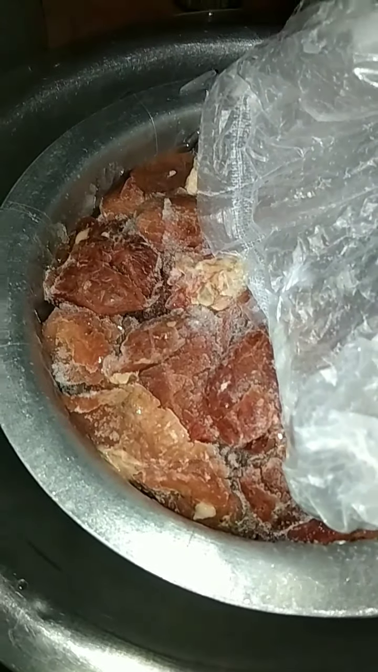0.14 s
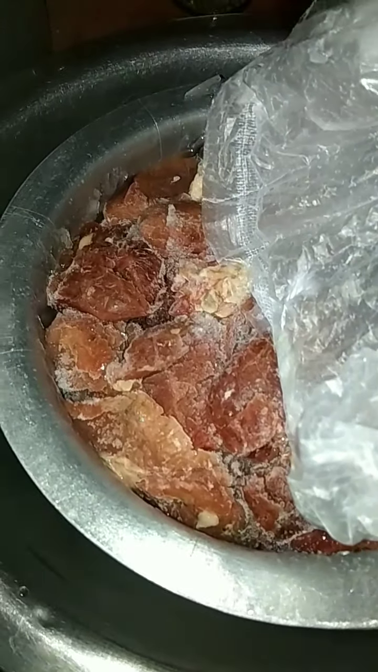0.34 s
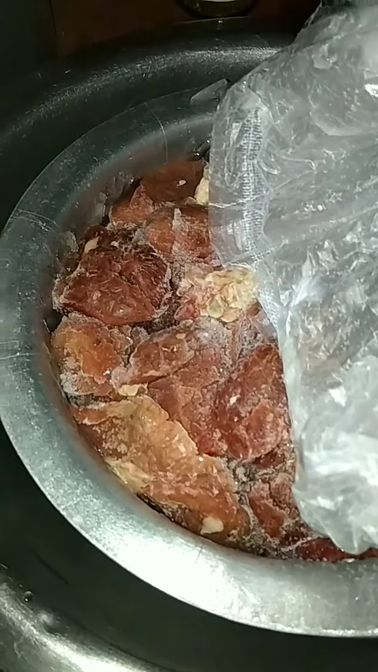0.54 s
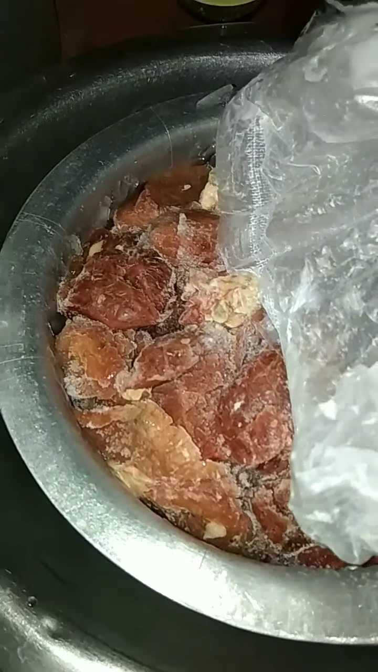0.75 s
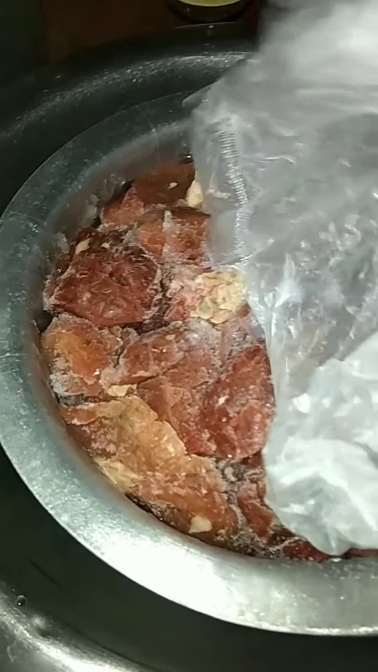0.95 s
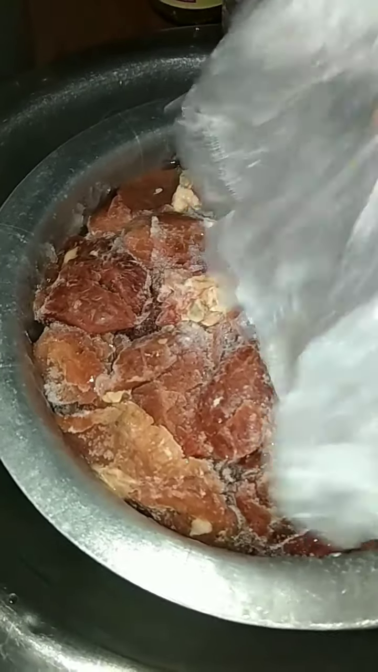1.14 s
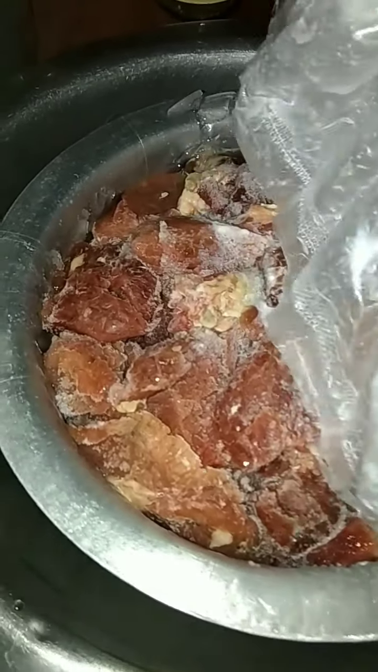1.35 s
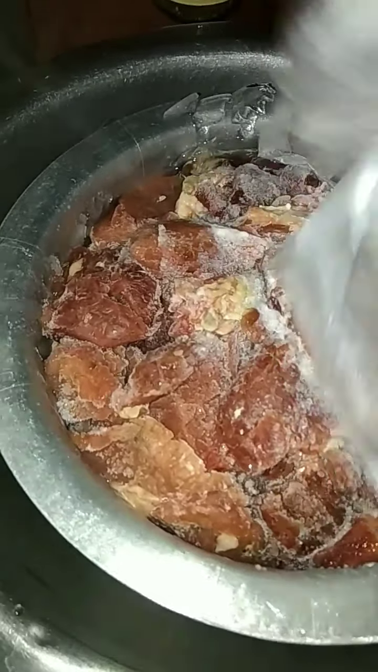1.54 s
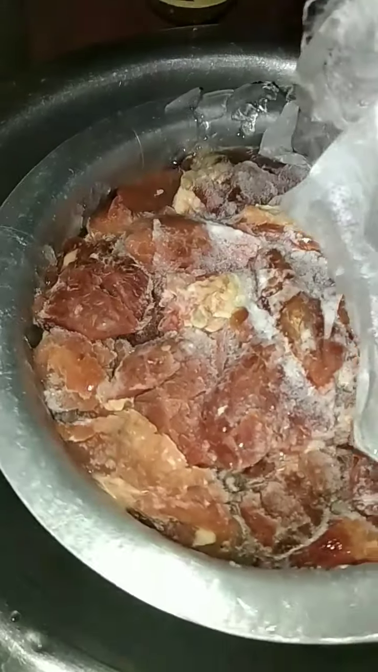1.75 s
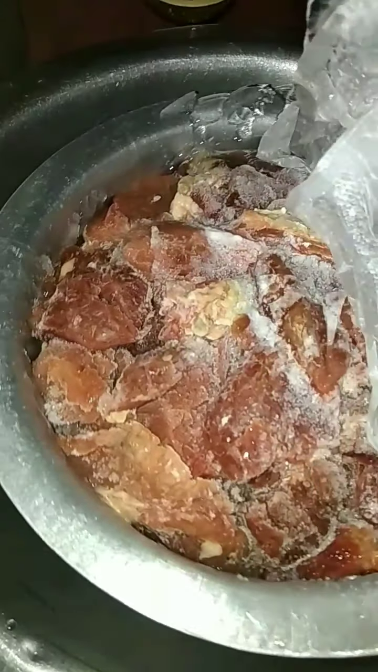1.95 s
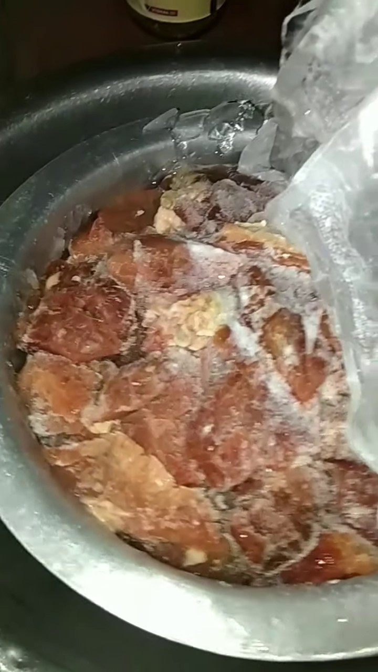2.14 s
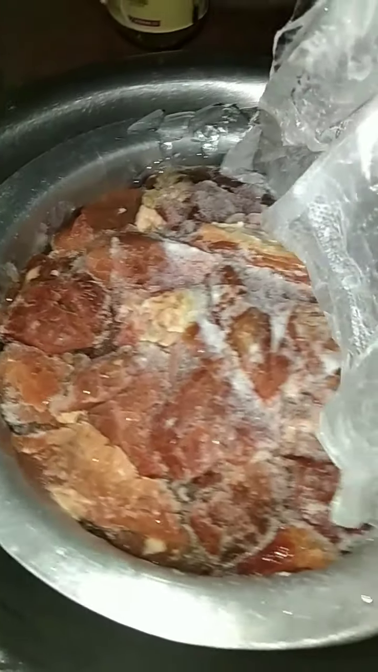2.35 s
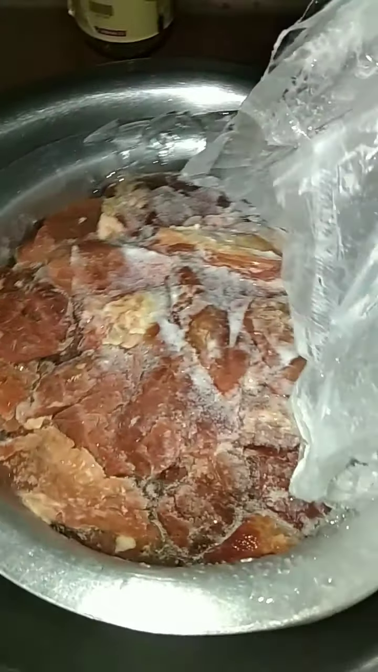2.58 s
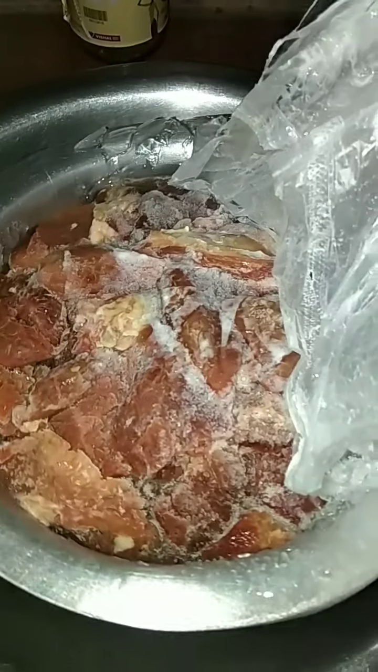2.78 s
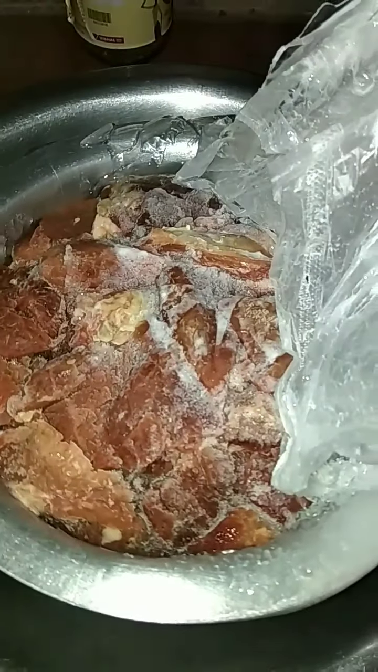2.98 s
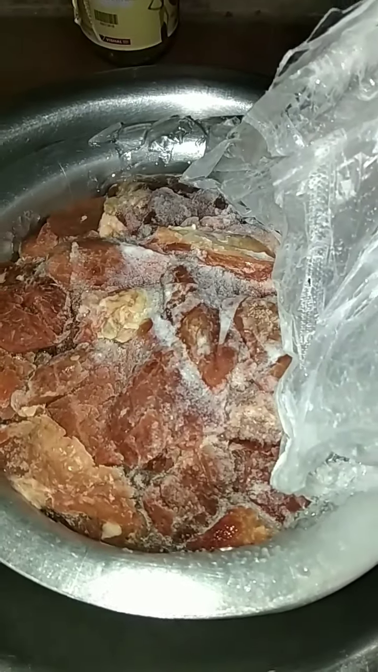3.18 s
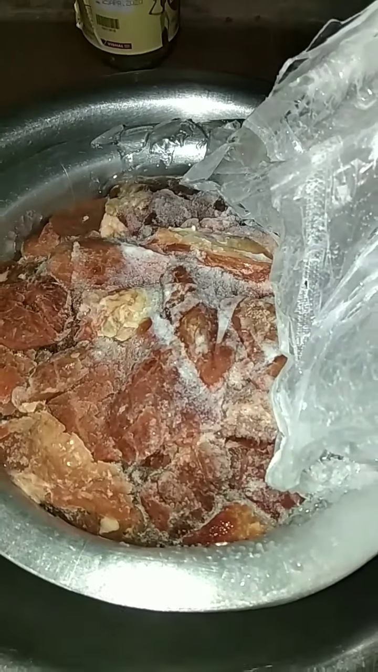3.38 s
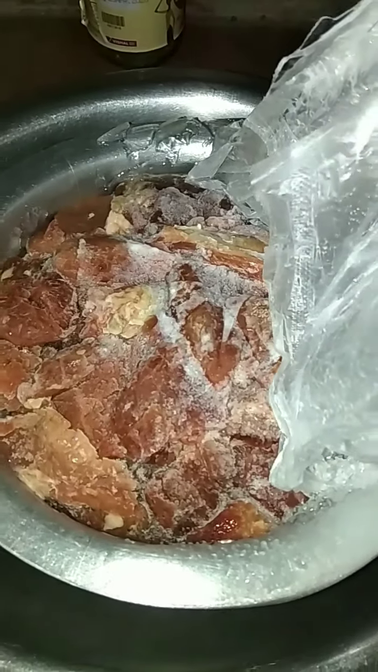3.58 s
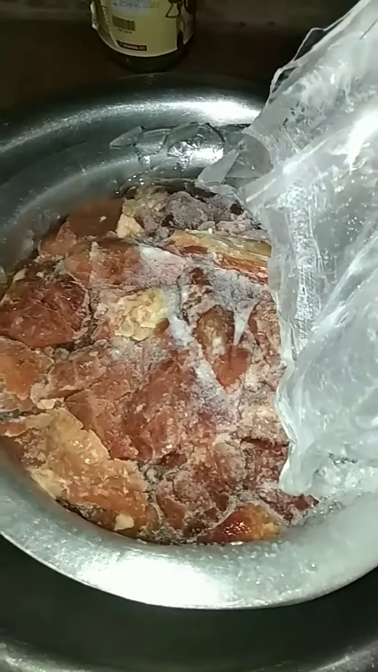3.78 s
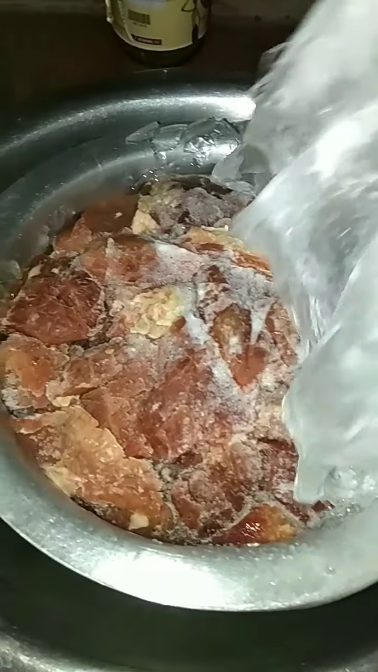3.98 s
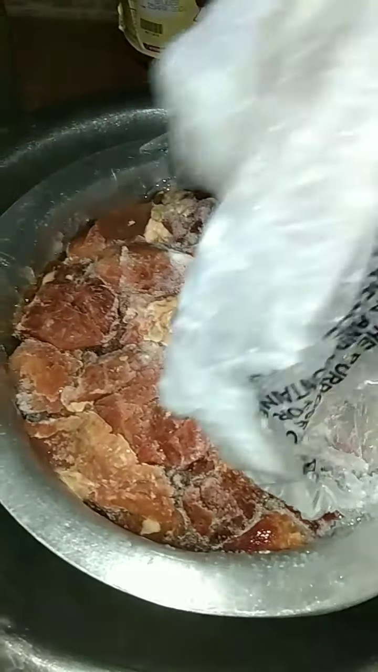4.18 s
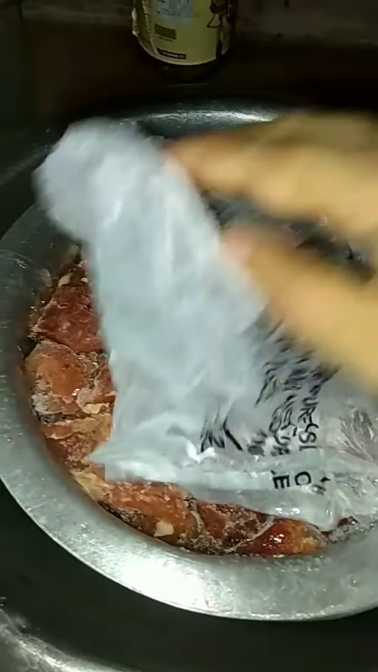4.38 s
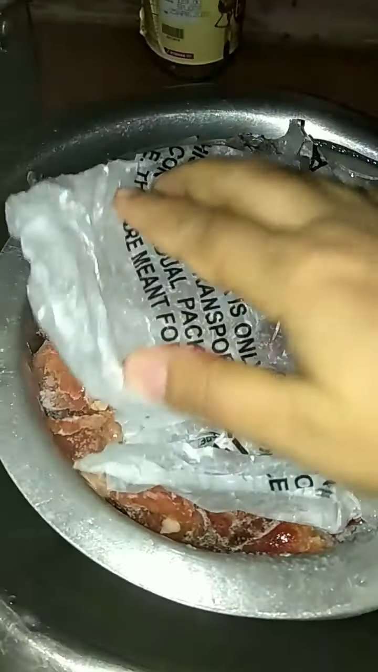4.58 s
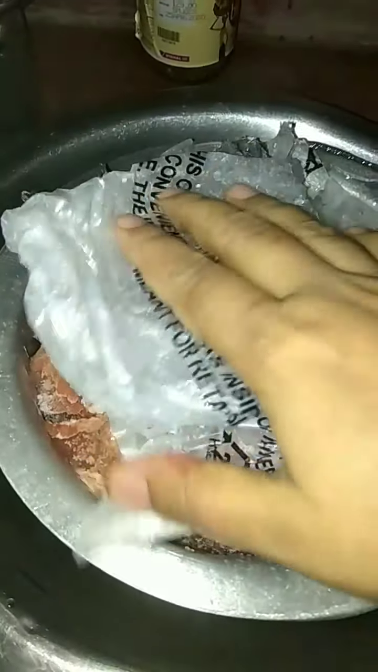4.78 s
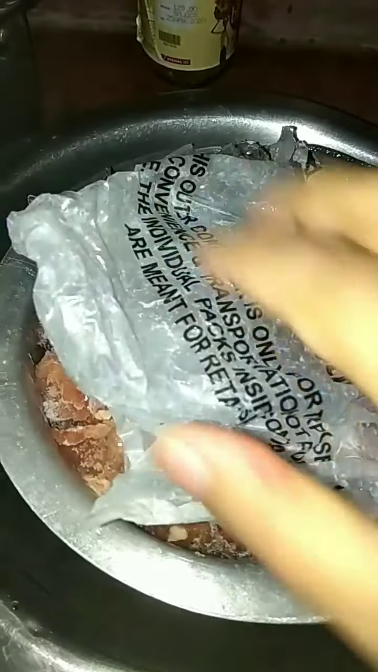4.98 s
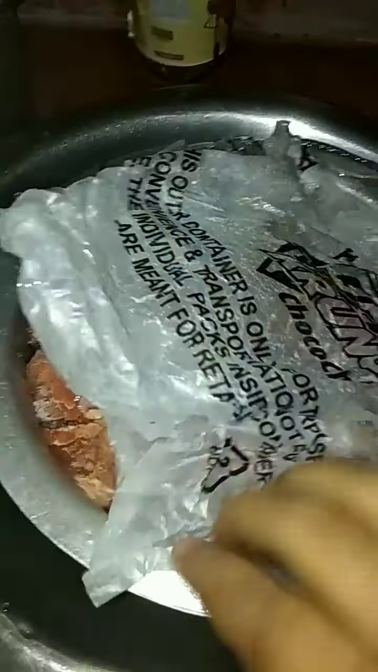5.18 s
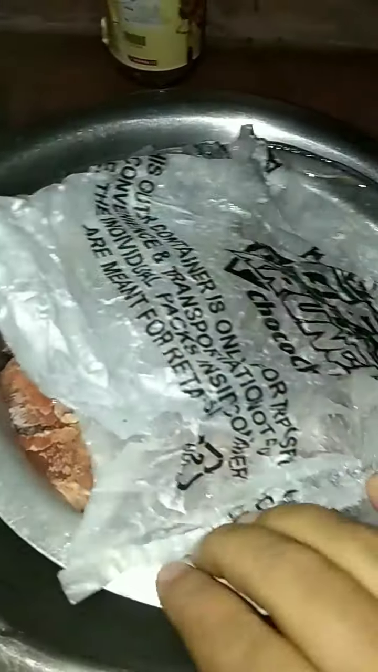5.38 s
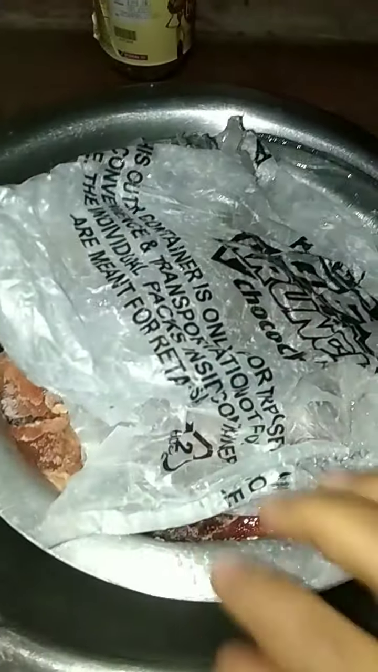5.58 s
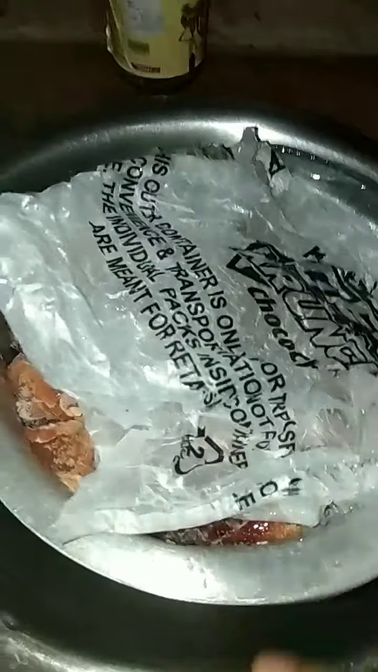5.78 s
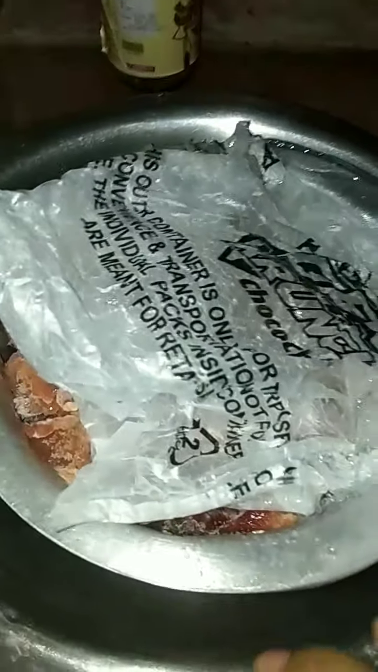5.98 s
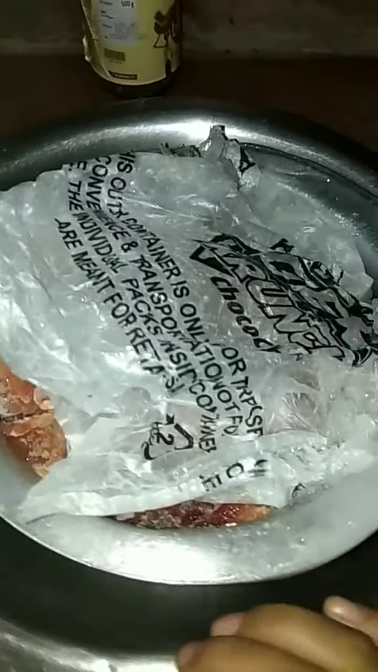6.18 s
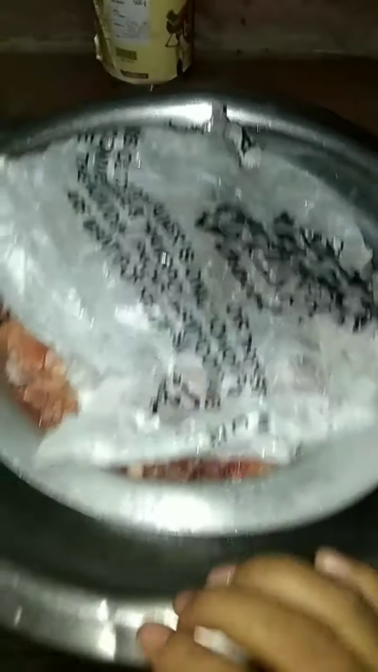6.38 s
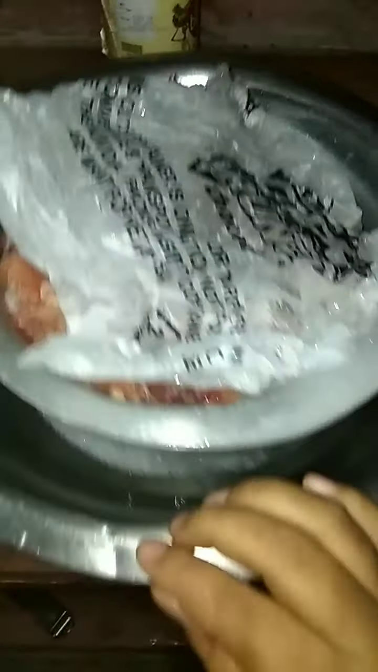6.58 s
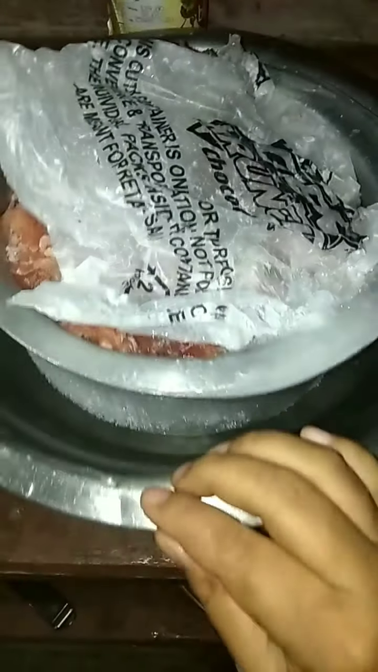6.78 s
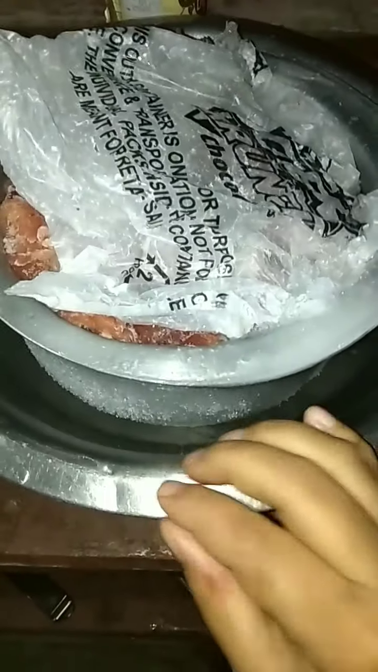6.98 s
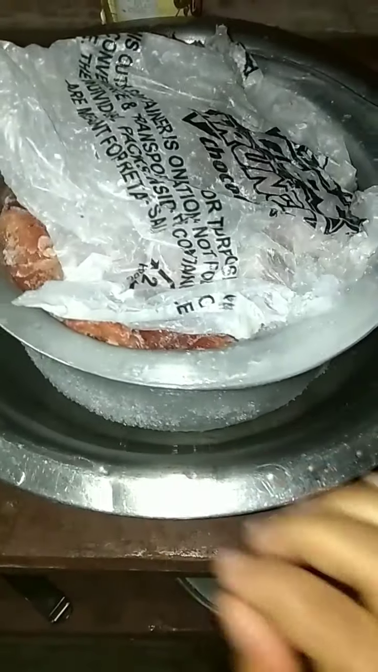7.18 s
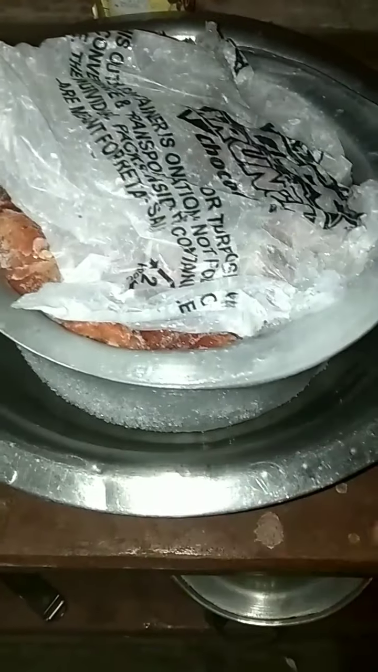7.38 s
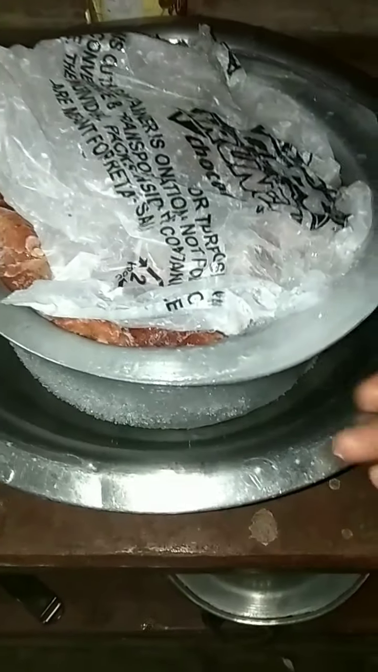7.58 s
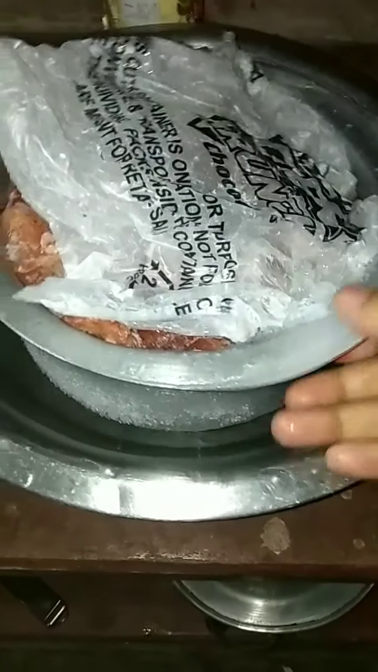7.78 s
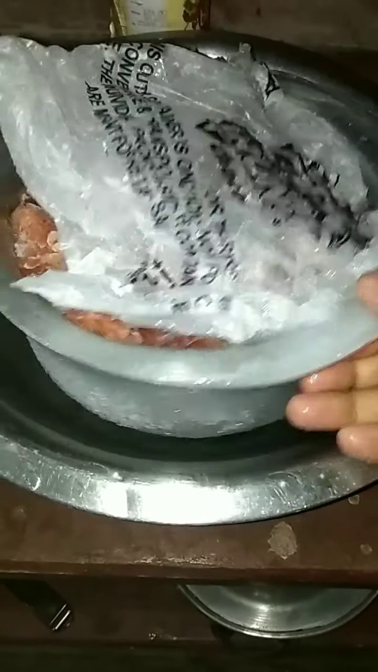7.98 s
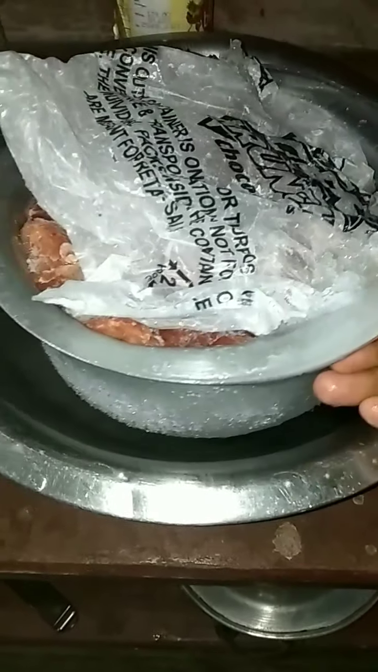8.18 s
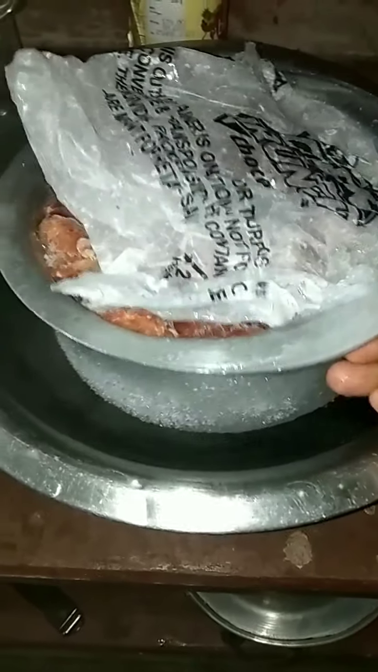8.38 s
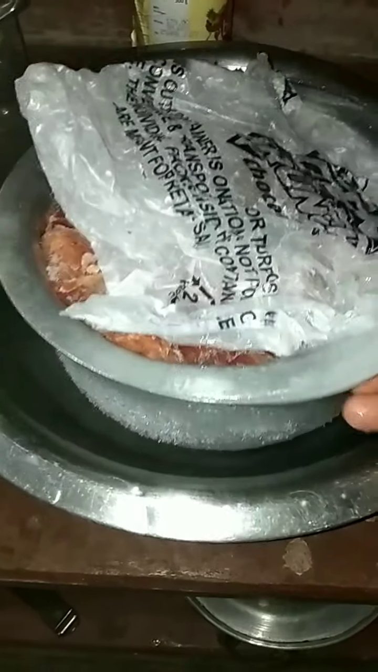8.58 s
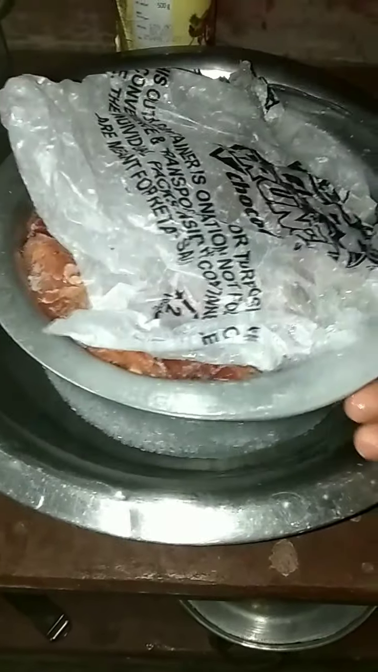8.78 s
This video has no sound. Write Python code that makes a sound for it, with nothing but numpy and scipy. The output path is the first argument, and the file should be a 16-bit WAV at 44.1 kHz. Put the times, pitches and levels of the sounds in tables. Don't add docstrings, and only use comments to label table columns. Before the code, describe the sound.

Crisp plastic crackling starts quietly, swells to its loudest within two seconds and thins into small ticks. A softer, broader rustle follows as the bag is laid back and pressed, with a faint distant crow behind. After a short quiet gap, a steel basin scrapes and clunks on the counter, rings briefly, then slips a few more times. Close miking, short room echo, low hum and hiss.

```python
import sys
import numpy as np
from scipy import signal
from scipy.io import wavfile

SR = 44100
rng = np.random.default_rng(int(sys.argv[2]) if len(sys.argv) > 2 else 0)


def magnitude_from_level(level_db):
    exponent = np.asarray(level_db, float) / 20
    return 10 ** exponent


def waveform_to_disk(signal):
    frames = np.transpose(np.atleast_2d(signal))
    scaled = np.clip(frames, -1, 1) * 32767
    samples = np.round(scaled).astype(np.int16)
    wavfile.write(sys.argv[1], SR, samples)


N = 389844

# (frequency [Hz], density [dB per Hz])
HUM_SPECTRUM = [(22, 14), (36, -6), (60, -17), (130, 0.5), (190, -13), (330, -4.5), (600, -9),
                (1000, -11.5), (2000, -18.5), (5000, -22), (8300, -27), (10300, -24), (12000, -28),
                (14000, -29), (15800, -30)]
# (frequency [Hz], left-right likeness [-1..1])
HUM_LIKENESS = [(60, 0.73), (180, 1), (550, 0.58), (1650, -0.095), (4970, -0.083), (15000, 0.064)]
# (time [s], peak level [dB], half length [s])
RUMBLE_SWELLS = [
    (0.5, -52, 0.44),
    (1.19, -45, 0.12),
    (1.62, -30, 0.13),
    (2.9, -51.5, 0.47),
    (5.403, -55, 0.31),
    (6.92, -48.5, 0.21),
    (7.8, -53, 0.29),
    (8.074, -47, 0.066),
    (8.787, -33, 0.04),
]
# (frequency [Hz], difference [dB])
PAIR_TILT = [(60, 7), (150, -3), (380, 0), (950, -2), (2380, -4), (5980, -2), (15000, -3)]
# (frequency [Hz], density [dB per Hz])
FILM_SPECTRUM = [(65, -30), (120, -7.5), (190, -6), (310, -3.5), (400, -1.5), (600, -6.5), (1500, -3.5),
                 (2600, -6), (5000, -4), (8200, -8.5), (10300, -1.5), (12500, -4), (15000, -5), (16200, -7)]
# (time [s], crease level [dB])
PEELING_MOVES = [
    [(0.45, -77), (0.634, -61.5), (0.652, -34.5), (0.786, -55.5), (0.818, -68)],
    [(0.818, -56), (0.85, -36), (1.03, -29.5), (1.068, -32.5)],
    [(1.068, -31), (1.085, -26), (1.125, -21), (1.18, -19.5), (1.226, -25.5), (1.241, -31), (1.252, -27),
     (1.285, -42), (1.372, -39.5)],
    [(1.372, -55), (1.39, -34.5), (1.45, -33.5), (1.5, -30)],
    [(1.5, -25), (1.52, -18), (1.534, -17.5), (1.549, -17.5), (1.575, -22.5), (1.6, -27.5), (1.704, -38),
     (1.984, -53), (2.03, -67)],
    [(2.13, -75), (2.176, -61), (2.282, -52), (2.302, -44.5), (2.53, -38), (2.692, -50.5), (2.712, -53),
     (2.728, -58), (2.774, -78)],
    [(2.8, -72), (2.87, -56.5), (2.98, -73), (3.006, -55), (3.052, -68.5), (3.3, -57.5), (3.406, -84),
     (3.494, -53), (3.736, -76)],
]
# (time [s], crease level [dB])
LAYING_MOVES = [
    [(3.74, -68), (3.766, -59), (3.914, -63), (3.976, -42.5), (4.268, -34.5), (4.35, -31), (4.43, -30),
     (4.47, -33), (4.644, -38), (4.702, -45)],
    [(4.702, -54), (4.72, -45), (4.732, -38), (4.746, -32.5), (4.776, -46), (4.822, -40), (4.842, -47.5),
     (5.0, -75)],
    [(5.1, -86), (5.158, -35.5), (5.216, -40), (5.298, -61), (5.326, -48.5), (5.38, -76)],
    [(5.39, -63), (5.5, -53.5), (5.53, -54), (5.58, -62)],
]
# (mid share [dB], low share [dB])
MOVE_BODY = [(-8, -10.5), (-13, -15), (-15.5, -16.5), (-15, -15), (-13, -15), (-12.5, -15.5), (-11, -3.5),
             (-14, -17), (-12.5, -16.5), (-12, -18.5), (-10, -5)]
# (time [s], peak level [dB], mid share [dB])
FILM_SNAPS = [(0.4647, -35.5, -14.5), (0.537, -49, -14), (0.5696, -45, -2), (0.5936, -33.5, -20),
              (0.6476, -23, -25), (0.7744, -29.5, -10), (0.8367, -34, -20), (0.851, -35, -23),
              (1.0753, -13, -26), (1.1, -16, -25), (1.252, -17, -27), (1.3226, -18, -19.5),
              (1.3808, -18, -35), (1.4442, -16, -17), (1.507, -15, -14), (1.518, -5, -21),
              (1.734, -25.5, -13.5), (1.8559, -25.5, -16), (1.9637, -28, -17), (2.0381, -25.5, -22.5),
              (2.042, -32, -23), (2.167, -36, -16), (2.201, -38.5, -17), (2.2463, -38, -13),
              (2.2997, -28.5, -16), (2.307, -30, -19), (2.3415, -24.5, -24), (2.346, -22, -22),
              (2.354, -23, -25), (2.361, -30, -23), (2.445, -29, -22), (2.46, -27, -22),
              (2.513, -24, -18), (2.571, -31, -25), (2.589, -28, -25), (2.62, -30, -20),
              (2.692, -33, -12), (2.698, -32, -12), (2.4988, -20, -12), (2.6444, -25, -25),
              (2.6777, -25.5, -17), (2.725, -23, -17),
              (2.79, -31.5, -31), (2.8544, -43, -25), (2.8732, -30, -34), (3.017, -32, -14),
              (3.118, -37, -9), (3.173, -34.5, -11), (3.192, -38, -20), (3.225, -36, -11),
              (3.2395, -37, -11), (3.3045, -33, -8), (3.4674, -39, -9), (3.494, -36, -17),
              (3.5302, -34.5, -13.5), (3.5987, -38, -16), (3.6124, -39, -21), (3.6805, -34.5, -15),
              (3.759, -31.5, -19), (3.771, -42, -10), (3.813, -38.5, -11), (3.8324, -35, -16),
              (3.943, -35, -10), (4.039, -37, -14), (4.2535, -20, -13.5), (4.421, -20, -20),
              (4.443, -25, -20), (4.58, -30, -25), (4.595, -35, -25), (4.715, -26, -24),
              (4.7436, -22.5, -21), (4.8075, -28, -29), (5.1307, -42, -6), (5.1473, -22, -20),
              (5.3173, -34, -15), (5.4027, -44.5, -5), (5.4263, -42, -11), (5.496, -35.5, -15),
              (5.522, -35, -11), (5.8481, -40, -29)]
# (frequency [Hz], level [dB], t60 [s])
POT_RIM_MODES = [(1320, -17, 0.32), (2090, -5, 0.34), (3150, -7, 0.14), (3795, -8, .25), (4495, -17, .2)]
# (time [s], length [s], level [dB], pitch [Hz])
CROW_CALLS = [
    (4.717, .22, -45, 535),
    (5.41, .25, -48, 525),
]
# (frequency [Hz], width [Hz], level [dB])
CROW_THROAT = [(1030, 270, -11.5), (1600, 200, -2), (1950, 470, 1.7)]
# (time [s], grit level [dB])
BASIN_PUSHES = [
    [(6.2, -76), (6.225, -46), (6.338, -37), (6.378, -42), (6.39, -33), (6.418, -44)],
    [(6.418, -41), (6.64, -44), (6.722, -50.5)],
    [(6.722, -58), (6.742, -29.5), (6.772, -49.5), (6.784, -31), (6.83, -52.5), (6.905, -51.5), (6.93, -68)],
    [(7.48, -86), (7.5, -52), (7.55, -80)],
    [(7.98, -95), (8.0, -46), (8.036, -50), (8.124, -60.5), (8.135, -77)],
    [(8.3, -63), (8.34, -32), (8.424, -63)],
    [(8.424, -60), (8.446, -46), (8.508, -79), (8.53, -49), (8.56, -93)],
    [(8.72, -86), (8.744, -45), (8.762, -45), (8.8, -46.5), (8.84, -61)],
]
# (mid share [dB], low share [dB], steel drive over grit [dB])
PUSH_BODY = [(-6, -1.5, 4), (-3.5, -1, 2.5), (-5, 0.5, 13), (-1, -17, 11), (-1.5, 4.5, -11),
             (-6, -6.5, -23), (3, 6.5, 0), (-9, 5.5, -6)]
# (frequency [Hz], density [dB per Hz])
GRIT_SPECTRUM = [(140, -34), (230, -1), (317, -11.5), (691, -7.5), (918, -0.5), (1200, -11), (1500, -6.5),
                 (2390, -7.5), (4010, -11), (4870, -8), (11600, -8.5), (14000, -6), (16000, -14)]
# (time [s], peak level [dB], mid share [dB])
GRIT_TICKS = [(6.227, -24.5, -18.5), (6.3874, -19.5, -22), (6.5914, -27.5, -29), (6.7395, -29, -19),
              (7.061, -37, -30), (7.503, -47, -10), (7.9997, -26.5, -17), (8.027, -34, -6),
              (8.3354, -24, -15), (8.4382, -33.5, -19), (8.758, -23.5, -22), (8.7839, -31, -12)]
# (time [s], peak level [dB], modes favoured by the contact [Hz])
BASIN_KNOCKS = [(6.227, -32, 1020), (6.261, -36.5, 930), (6.29, -38, 930), (6.33, -42, 930),
                (6.389, -55, 1280), (6.638, -38, 950), (6.652, -38, 950), (6.678, -38.5, 950),
                (6.69, -40, 950), (6.738, -28, 1080), (6.74, -38, 1550), (6.756, -31, 335),
                (6.783, -23.5, 980), (6.786, -36, 1300), (6.807, -31, 1320), (6.862, -32.5, 226),
                (6.884, -42, 280), (6.951, -33, 224), (7.51, -51.5, 1300), (8.026, -30.5, 570),
                (8.028, -36.5, 900), (8.043, -35.5, 250), (8.051, -40.5, 91), (8.06, -43, 1320),
                (8.443, -38.5, 1370), (8.466, -47.5, 300), (8.555, -45.5, 294), (8.576, -43, 289),
                (8.739, -31, 483), (8.74, -40, 1500), (8.758, -30.5, 1030), (8.783, -35.5, 277),
                (8.806, -45, 300)]
# (frequency [Hz], level [dB], t60 [s])
BASIN_MODES = [(86, 5.5, 0.098), (190.7, -1, 0.23), (250, 5, 0.062), (291.6, -2.5, 0.18), (350, -26, 0.016),
               (480, 2.5, 0.048), (517.6, -4, 0.12), (588, -10, 0.073), (722, -13.5, 0.16),
               (824, -13, 0.12), (945, 1, 0.1), (1030, -2, 0.046), (1140, -1.5, 0.033), (1240, -12, 0.033),
               (1318, -6, 0.1), (1400, 5.5, 0.017), (1750, -1, 0.033), (2280, -18, 0.054)]
# (frequency [Hz], level [dB], t60 [s])
LIFTED_MODES = [(824, -7, .35), (913, -4, .3), (1309, -2, 0.43), (1470, -14, .3), (1712, -13, 0.33)]

CRACK_EDGES_HZ = 113 * 2 ** np.arange(0, 7.4, 1 / 3)


def rms_one(x):
    return x / np.sqrt(np.mean(x ** 2) + 1e-20)


def at_hz(points, hz):
    table_hz, value = np.transpose(points)
    return np.interp(np.log(hz), np.log(table_hz), value)


def band(x, low_hz, high_hz):
    sos = signal.butter(2, [low_hz, high_hz], "band", fs=SR, output="sos")
    return signal.sosfilt(sos, np.asarray(x) + 1e-18)


def drift(rate_hz):
    r = np.exp(-80 * np.pi * rate_hz / SR)
    noise = rng.standard_normal(N // 40 + 2002)
    slow = signal.lfilter([1], [1, -2 * r, r * r], noise)[2000:]
    return np.interp(np.arange(N) / 40, np.arange(len(slow)), rms_one(slow))


def ring(clicks, hz, t60):
    r, w = magnitude_from_level(-60 / (t60 * SR)), 2 * np.pi * hz / SR
    return signal.lfilter([0, np.sin(w)], [1, -2 * r * np.cos(w), r * r], clicks + 1e-18)


def room_hum(white):
    out, edges = 0, 22 * 2 ** np.arange(0, 9.6, 1 / 3)
    for k, (low, high) in enumerate(zip(edges, edges[1:])):
        hz = np.sqrt(low * high)
        mid, side = band(white[k % 2], low, high)
        alike = np.clip(at_hz(HUM_LIKENESS, hz), -1, 1)
        gain = magnitude_from_level(at_hz(HUM_SPECTRUM, hz) + 1.0 * drift(4.3))
        out = out + gain * (np.sqrt(1 + alike) * mid + np.sqrt(1 - alike) * side * [[1], [-1]])
    return magnitude_from_level(-48.5) * rms_one(out)


def capsule_hiss(white):
    return magnitude_from_level(-63) * rms_one(band(white[1, ::-1], 9640, 10750))


def low_rumble(white):
    time = np.arange(N) / SR
    swell = magnitude_from_level(-53)
    for at, db, half_s in RUMBLE_SWELLS:
        swell = swell + magnitude_from_level(db) * np.exp(-((time - at) / half_s) ** 2)
    rumble = rms_one(band(white[0, 0] + 0.35 * white[1], 43.2, 73))
    return swell * magnitude_from_level(-5.5) * rumble * magnitude_from_level(np.array([[-1.2], [1.2]]))


def cracks(grains, spectrum, low_hz, spread_db, patchy_db):
    at, db, mid_db, low_db, pan_db, lag_s = grains
    out = np.zeros((2, N))
    own = rng.standard_normal((len(at), len(CRACK_EDGES_HZ)))
    anchors = np.log([low_hz, 3500, 9000])
    for k, (low, high) in enumerate(zip(CRACK_EDGES_HZ, CRACK_EDGES_HZ[1:])):
        hz = np.sqrt(low * high)
        arrival_s = np.array([at + lag_s * (hz > 500), at])
        place = np.clip(np.round(arrival_s * SR).astype(int), 0, N - 1)
        low_share = np.interp(np.log(hz), anchors, [1, 0, 0])
        mid_share = np.interp(np.log(hz), anchors, [0, 1, 0])
        chance_db = spread_db * own[:, k] + patchy_db * drift(45)[place[1]]
        colour_db = low_share * low_db + mid_share * mid_db + at_hz(spectrum, hz)
        size = magnitude_from_level(db + colour_db + chance_db) * np.sign(own[:, k - 1])
        lean_db = pan_db + at_hz(PAIR_TILT, hz)
        clicks = [np.bincount(place[c], size * magnitude_from_level(lean_db * (.5 - c)), N) for c in (0, 1)]
        out += band(clicks, low, high)
    return out


def creases(curve, body, per_s, busy_db, uneven_db, clump_db, pan_db, lag_s, lag_spread_s):
    start, length = curve[0][0], curve[-1][0] - curve[0][0]
    count = int(per_s * length)
    draw = rng.random((count, 3))
    at = start + length * draw[:, 0]
    db = np.interp(at, *np.transpose(curve))
    share = np.clip(magnitude_from_level(.8 * (db - busy_db)), .04, 1)
    uneven = -uneven_db * np.log(np.clip(draw[:, 1], .008, 1))
    clumps = clump_db * (1 - 0.88 * share) * drift(80)[(at * SR).astype(int) - 1]
    size_db = db - 10 * np.log10(share) + uneven + clumps
    size_db = np.where(draw[:, 2] < share, size_db, -200)
    lag = lag_s + lag_spread_s * rng.standard_normal(count)
    low_db = body[1] + 0.017 * (db - busy_db)
    pan = pan_db + 3 * rng.standard_normal(count)
    return at, size_db, 0 * at + body[0], low_db, pan, lag


def lone(events, gain_db, mid_gain_db, low_db, pan_db, lag_s, run_s, fade_db, count):
    at, db, mid_db = np.repeat(np.transpose(events), count, axis=1)
    late = rng.random((len(events), count)) * (np.arange(count) > 0)
    late = late.ravel()
    size_db = db + gain_db - fade_db * np.sqrt(late)
    return at + run_s * late, size_db, mid_db + mid_gain_db, 0 * at + low_db, 0 * at + pan_db, 0 * at + lag_s


def bag():
    dense = np.hstack([
        creases(curve, body, per_s=7750, busy_db=-32, uneven_db=3.0, clump_db=2.5,
                pan_db=0.5, lag_s=.0003, lag_spread_s=.00005)
        for curve, body in zip(PEELING_MOVES + LAYING_MOVES, MOVE_BODY)])
    dense = dense + [[0], [8.0], [11], [12], [0], [0]]
    snaps = lone(FILM_SNAPS, gain_db=13.0, mid_gain_db=13.0, low_db=-4,
                 pan_db=-0.5, lag_s=0.00039, run_s=0.003, fade_db=7.5, count=9)
    return cracks(np.hstack([dense, snaps]), FILM_SPECTRUM, low_hz=466, spread_db=3.5, patchy_db=2.0)


def echo(x, t60):
    length = 20000
    tail = rng.standard_normal((3, length)) * magnitude_from_level(-60 * np.arange(length) / SR / t60)
    bass = magnitude_from_level(-3.0) * band(tail[0], 47, 440)
    tail = bass + band(band(tail[1:], 434, 17000), 517, 13800)
    tail = tail / np.sqrt(np.sum(tail ** 2) / 2)
    tail = np.pad(tail, ((0, 0), (60, 0)))
    return signal.fftconvolve(x, tail, axes=1)[:, :N]


def kitchen(near):
    move_s = .08
    turn = np.arange(N) / SR / move_s
    out = 0
    for k in range(4):
        fade = np.clip(1 - np.abs((turn - k) % 4 - 2), 0, 1) ** .5
        out = out + echo(near * fade, t60=0.11)
    return magnitude_from_level(-2.0) * out


def pot_rim():
    click = np.zeros(N)
    click[int(.649 * SR)] = magnitude_from_level(-35)
    return sum(magnitude_from_level(db) * ring(click, hz, t60) for hz, db, t60 in POT_RIM_MODES)


def crow():
    sag, jitter, rasp, edge_s = .05, .02, 2.2, .09
    time, out = np.arange(N) / SR, np.zeros(N)
    for at, length, db, hz in CROW_CALLS:
        pitch = hz * (1 - sag * np.clip((time - at) / length, 0, 1) + jitter * drift(45))
        turns = np.cumsum(pitch) / SR
        puff = np.exp(-6 * (turns % 1))
        shape = np.clip(np.minimum(time - at, at + length - time) / edge_s + .5, 0, 1) ** 2
        out += magnitude_from_level(db) * shape * puff * (1 + rasp * rng.standard_normal(N))
    voice = sum(magnitude_from_level(db + 15.5) * band(out, hz - width / 2, hz + width / 2) for hz, width, db in CROW_THROAT)
    return magnitude_from_level(-4.0) * voice + echo(np.array([voice, voice]), t60=0.5)


def basin_grit():
    grains = np.hstack([
        creases(curve, body, per_s=7000, busy_db=-50, uneven_db=3.0, clump_db=6.0,
                pan_db=1.0, lag_s=.0001, lag_spread_s=.0002)
        for curve, body in zip(BASIN_PUSHES, PUSH_BODY)])
    grains = grains + [[0], [7.0], [6], [6], [0], [0]]
    ticks = lone(GRIT_TICKS, gain_db=19.0, mid_gain_db=18.5, low_db=-12, pan_db=-2.0,
                 lag_s=.0001, run_s=0.0096, fade_db=33, count=12)
    return cracks(np.hstack([grains, ticks]), GRIT_SPECTRUM, low_hz=1930, spread_db=4.5, patchy_db=3.0)


def basin_steel():
    time, drive, steel = np.arange(N) / SR, np.zeros(N), np.zeros((2, N))
    for curve, (_, _, steel_db) in zip(BASIN_PUSHES, PUSH_BODY):
        sliding = (time >= curve[0][0]) & (time <= curve[-1][0])
        grit_db = np.interp(time, *np.transpose(curve))
        drive += magnitude_from_level(grit_db + steel_db - 39.5) * sliding
    drive *= band(rng.standard_normal(N), 850, 1080)
    at, knock_db, favour_hz = np.transpose(BASIN_KNOCKS)
    for hz, db, t60 in BASIN_MODES:
        clicks = drive * magnitude_from_level(4.0 * drift(32))
        favoured_db = knock_db - 12.0 * np.log2(hz / favour_hz) ** 2
        clicks[(at * SR).astype(int)] += magnitude_from_level(favoured_db) * rng.choice([-1, 1], len(at))
        tone = magnitude_from_level(db - 0.5) * ring(clicks, hz, t60)
        soft = np.hanning(int(1.5 * SR / hz))
        contact = 2 * soft / soft.sum() * np.cos(2 * np.pi * hz / SR * np.arange(len(soft)))
        tone = signal.lfilter(contact, 1, tone)
        early = len(soft) // 3
        tone = np.pad(tone[early:], (0, early))
        steel += [np.roll(tone, 13 * (hz > 450)), tone]
    return steel


def lifted_basin():
    lift_s, gripped_s = 6.784, 6.9
    blow = np.zeros(N)
    blow[int(lift_s * SR)] = magnitude_from_level(-33.5)
    free = sum(magnitude_from_level(db) * ring(blow, hz, t60) for hz, db, t60 in LIFTED_MODES)
    free = free * magnitude_from_level(-900 * np.clip(np.arange(N) / SR - gripped_s, 0, 1))
    return np.array([np.roll(free, 13), free])


def scene():
    near = bag() + pot_rim() + basin_grit() + basin_steel() + lifted_basin()
    white = rng.standard_normal((2, 2, N))
    background = room_hum(white) + capsule_hiss(white) + low_rumble(white)
    return near + kitchen(near) + background + crow()


def band_limit(x):
    return signal.sosfilt(signal.butter(12, 16600, fs=SR, output="sos"), x)


def record(dry):
    rounded = 0.74 * np.tanh(dry / 0.7)
    top_cut = signal.cheby2(10, 50, 16500, fs=SR, output="sos")
    return band_limit(signal.sosfilt(top_cut, rounded))


dry = scene()
out = record(dry)
waveform_to_disk(out)
```